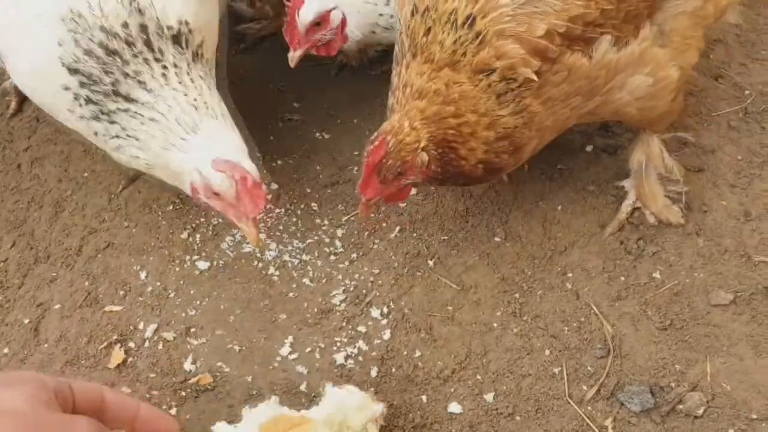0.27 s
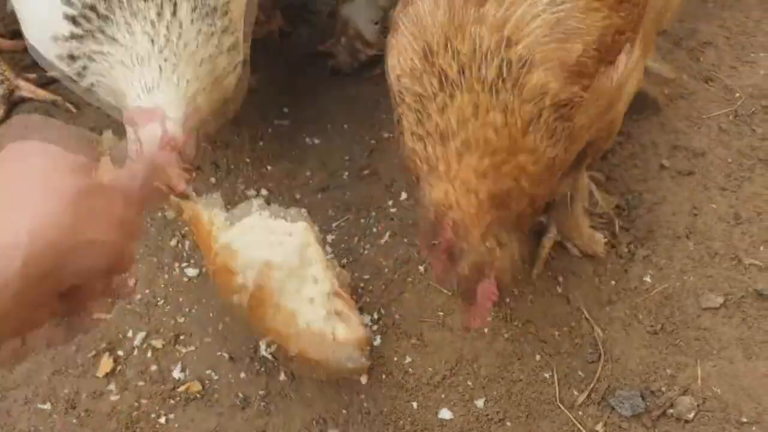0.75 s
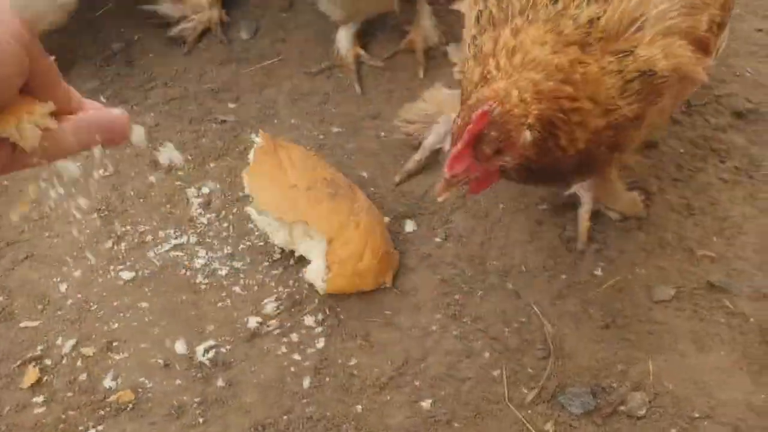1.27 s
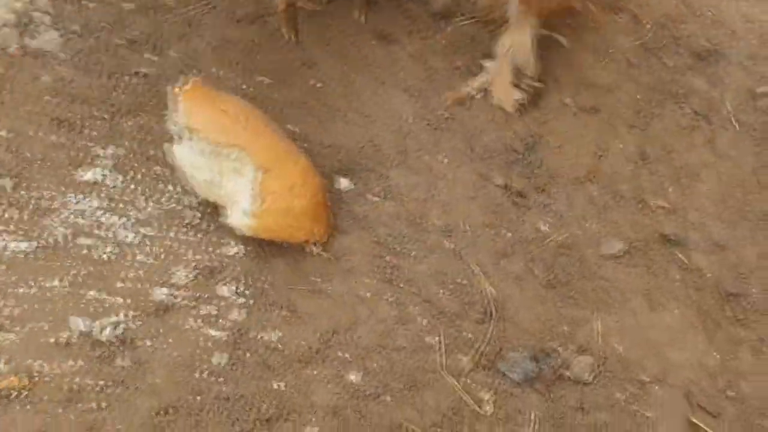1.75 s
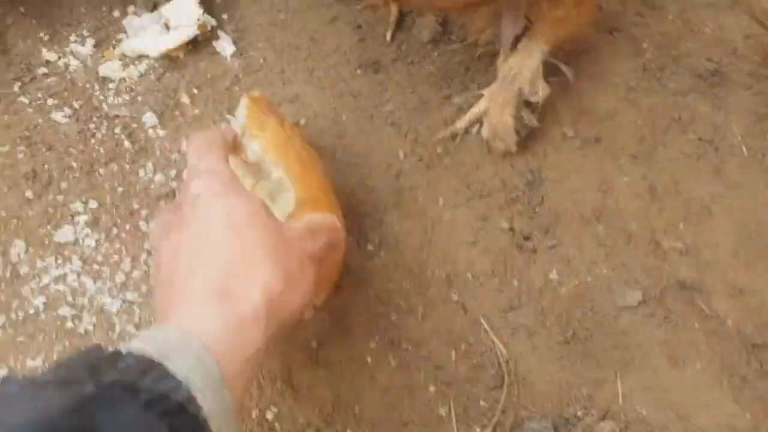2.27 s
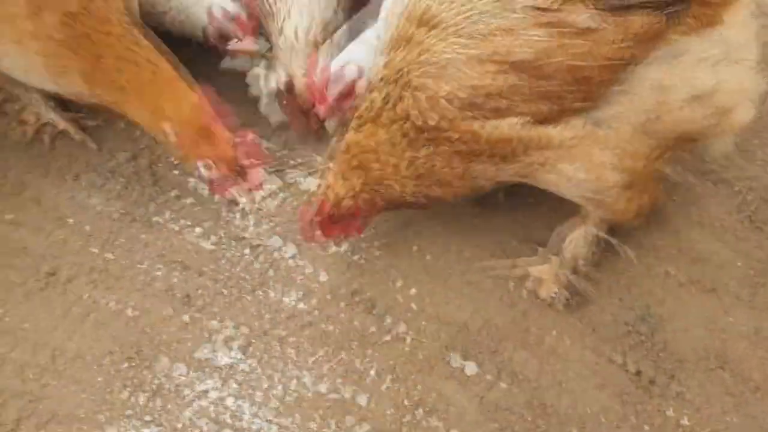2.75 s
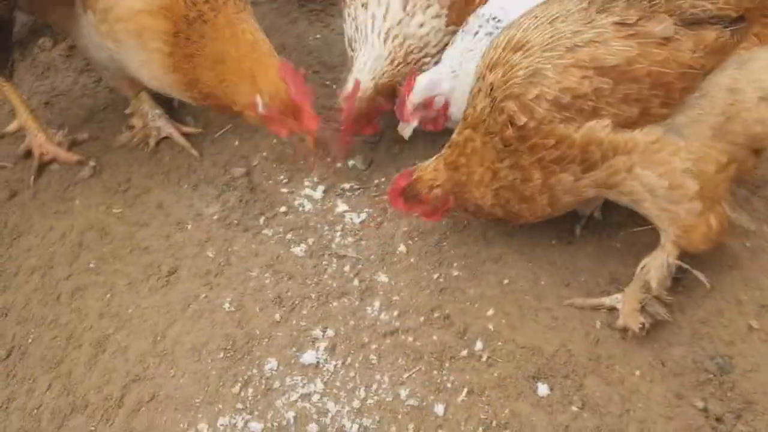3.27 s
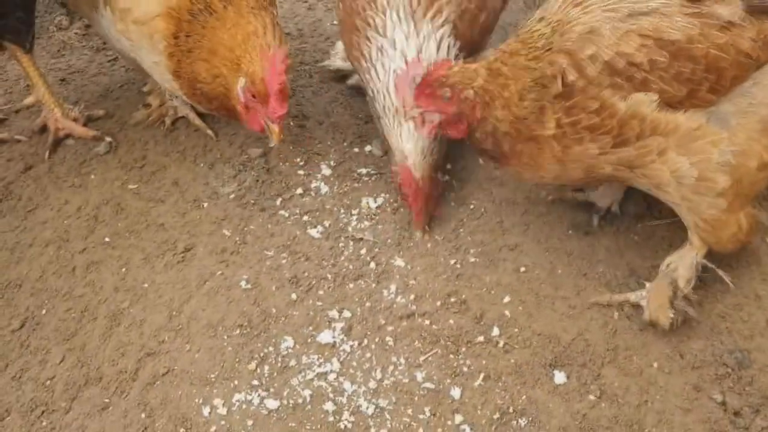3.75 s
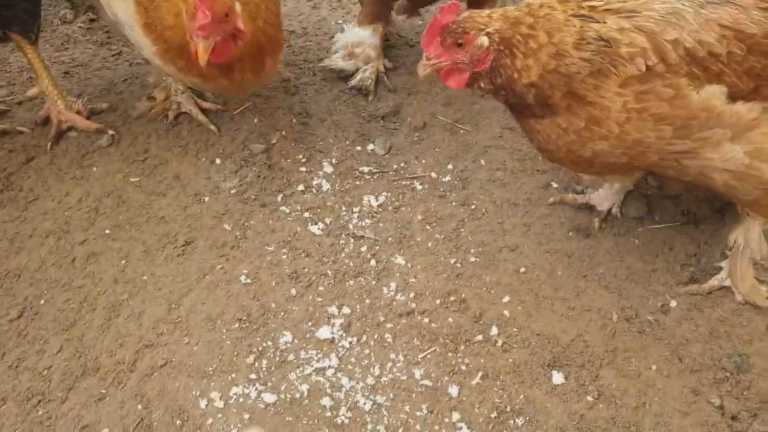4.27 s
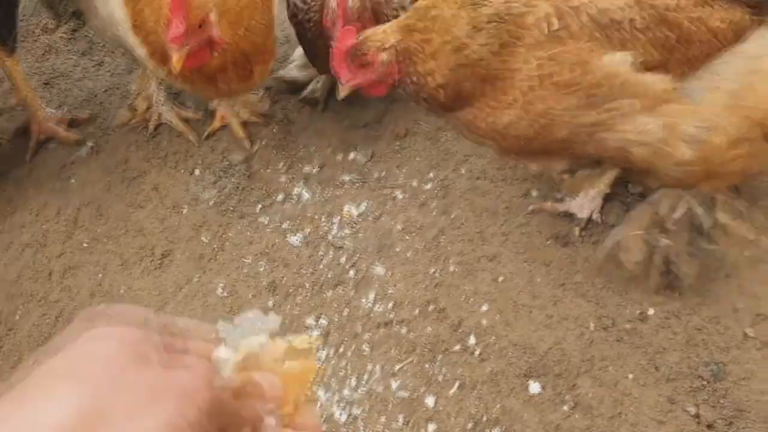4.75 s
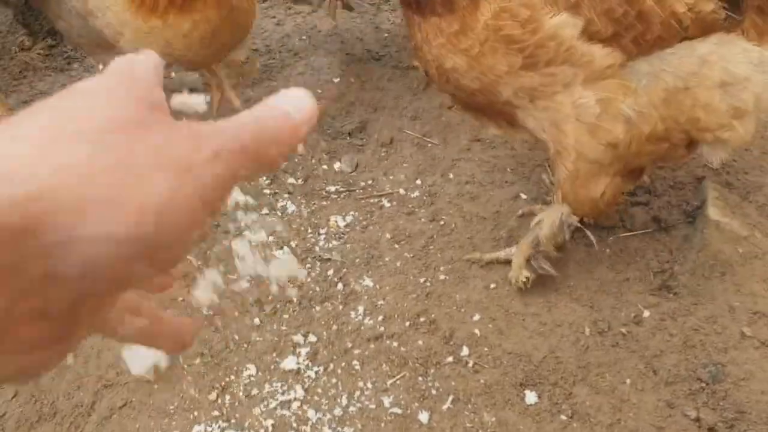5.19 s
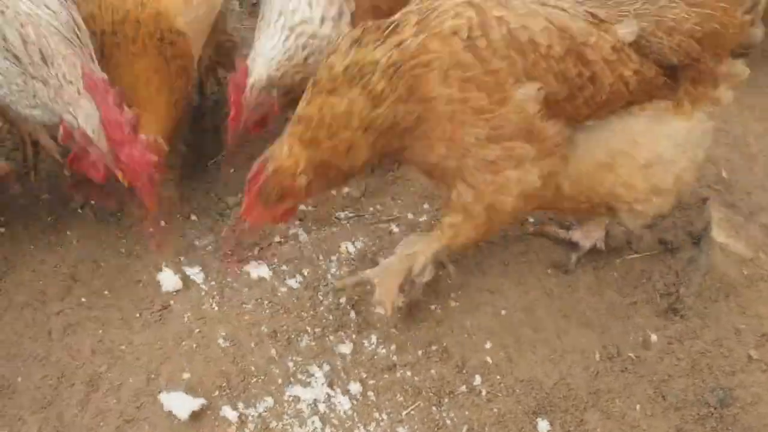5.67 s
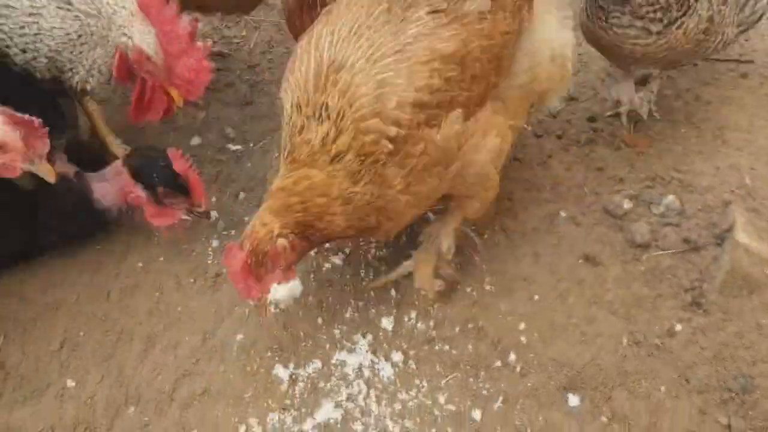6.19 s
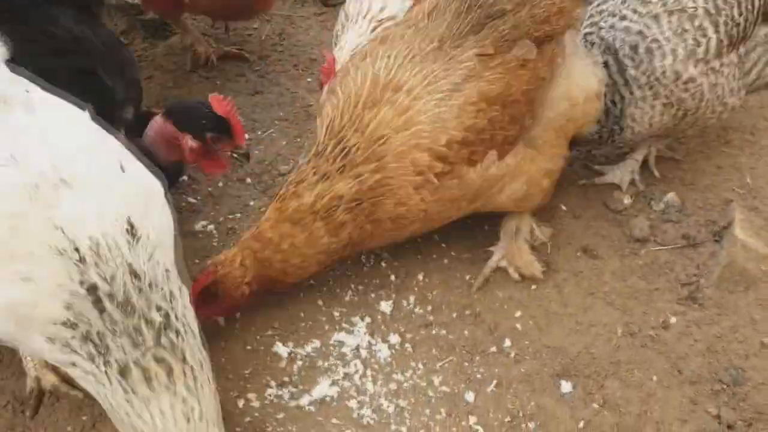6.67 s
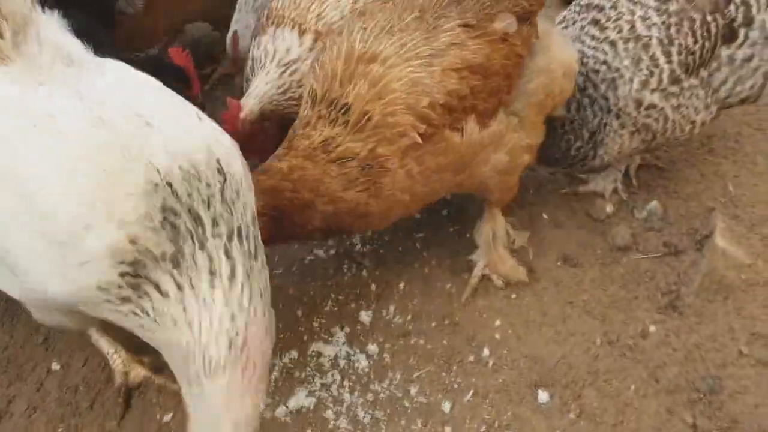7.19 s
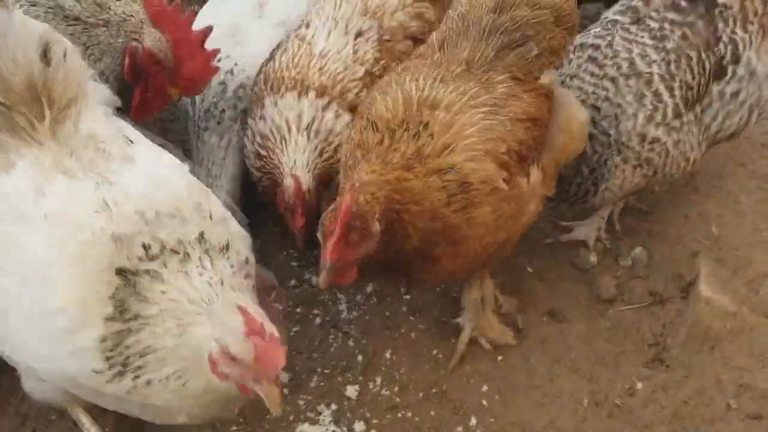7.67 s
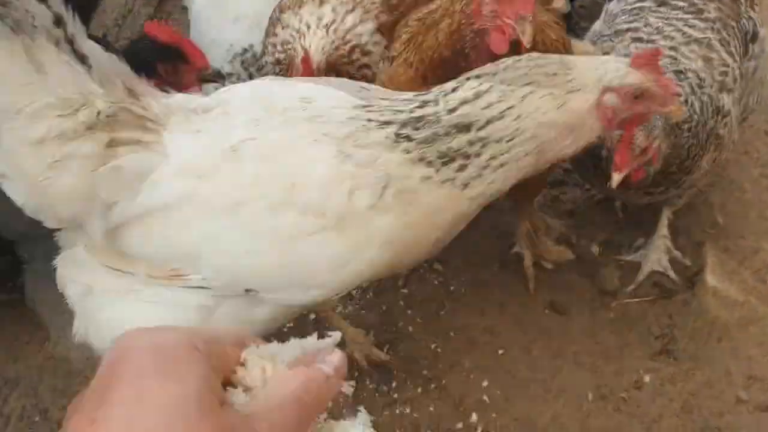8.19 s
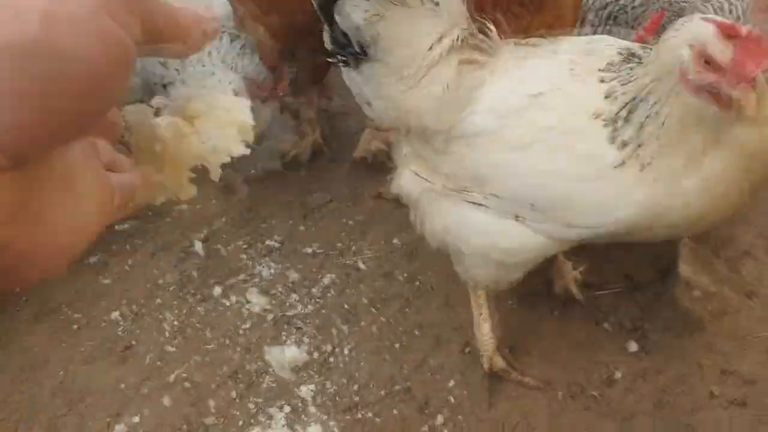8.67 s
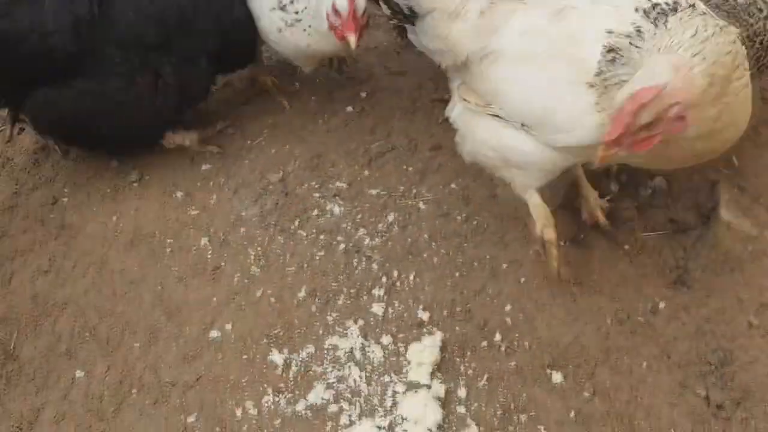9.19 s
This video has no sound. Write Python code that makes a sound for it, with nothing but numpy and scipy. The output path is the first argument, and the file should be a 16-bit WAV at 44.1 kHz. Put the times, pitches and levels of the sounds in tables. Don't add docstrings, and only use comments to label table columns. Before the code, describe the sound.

Close on a dirt yard, hens feed on bread. Quiet low murmurs and a rising hum come first, then a sharp peck and a burst of loud, throaty clucks between two and three seconds. Softer croaks follow, then fluttering trills, with ticking beaks, dull footfalls and rustling feathers. A small stereo microphone leans left over a faint low rumble.

```python
import sys
import numpy as np
from scipy import signal
from scipy.fft import rfft, irfft, next_fast_len
from scipy.io import wavfile
from scipy.ndimage import uniform_filter1d

SR = 44100
rng = np.random.default_rng(int(sys.argv[2]) if len(sys.argv) > 2 else 0)


def gain_from_decibels(decibels):
    exponent = np.asarray(decibels, float) / 20
    return 10 ** exponent


def transcribe(u):
    v = np.clip(np.atleast_2d(u).T, -1, 1)
    q = np.round(v * 32767).astype(np.int16)
    wavfile.write(sys.argv[1], SR, q)


N = 416304


def evened(x):
    return x / np.sqrt(np.mean(x ** 2) + 1e-20)


def read(points, hz):
    f, value = np.transpose(points)
    return np.interp(np.log(hz + 1), np.log(f + 1), value)


def wander(count, hz):
    return evened(signal.lfilter([1], [1, -np.exp(-2 * np.pi * hz / SR)], rng.standard_normal(count)))


def resonate(x, hz, width):
    turn = np.exp(2j * np.pi * np.cumsum(hz * np.ones(len(x))) / SR)
    r = np.exp(-np.pi * width / SR)
    return 2 * (turn * signal.lfilter([1 - r], [1, -r], x / turn + 1e-18)).real


def fade(count):
    u = np.arange(count) / SR
    return np.minimum(u / .003, 1) * np.minimum(u[::-1] / .014, 1)


def add(mix, s, sound, delay_ms, pan_db):
    lead = 32
    size = next_fast_len(len(sound) + 128)
    shift = np.array([[lead + delay_ms * SR / 1000], [lead]])
    z = rfft(sound, size) * np.exp(-2j * np.pi * np.fft.rfftfreq(size) * shift)
    ports = irfft(z, size) * gain_from_decibels([[pan_db / 2], [6.5 - pan_db / 2]])
    part = mix[:, round(s * SR) - lead:][:, :size]
    part += ports[:, :part.shape[1]]


def breath(row, lead_db, tail_db, first, last, hold, pitch_hold=None):
    s, rise, fall, db, hz = row
    t = np.arange(s - abs(rise), s + abs(fall), 1 / SR)
    early = t < s
    away = np.where(early, (s - t) / abs(rise), (t - s) / abs(fall))
    slack = away ** hold
    bend = away ** (pitch_hold or hold)
    effort_db = db - np.where(early, lead_db, tail_db) * slack
    pitch_hz = hz * (1 + (np.where(early, first, last) - 1) * bend)
    return t, effort_db, pitch_hz, slack


# centre in Hz, width in Hz, level in dB.
BEAK = [(2073, 190, 1), (2800, 250, -6), (3430, 700, -1), (4400, 1130, -9.5), (6080, 490, -14.5),
        (12500, 880, -15.5)]


def voice(effort_db, hz, mouth_hz, rough, uneven, bright_db):
    count = len(hz)
    under_peak_db = effort_db - effort_db.max()
    fray = .5 + (1.3 - .5) * np.clip(-under_peak_db / 12, 0, 1)
    width = 210 + 950 * rough
    rough, uneven = rough * fray, uneven * fray

    jitter = .3 * rough * wander(count, 150) + .025 * wander(count, 25)
    turns = np.cumsum(hz * (1 + jitter)) / SR
    folds = sum(np.cos(2 * np.pi * k * turns + .08 * k * k) * (k * hz < 9000) for k in range(1, 18))
    folds *= 1 + uneven * np.cos(np.pi * turns) + 1.31 * uneven * np.cos(2 / 3 * np.pi * turns)
    folds *= gain_from_decibels(9 * rough * wander(count, 70))
    puffs = (0.75 + np.exp(-(turns % 1) / 0.78)) * rng.standard_normal(count)
    drive = (1 - rough) * evened(folds) + .8 * rough * evened(puffs)

    def ring(f, w):
        return resonate(resonate(drive, f, w), f, w)

    mouth_hz = mouth_hz * gain_from_decibels(0.11 * under_peak_db + .5 * wander(count, 25))
    mouth, pipe = ring(mouth_hz, width), ring(350, 600)
    chest, open_pipe = ring(230, 200), ring(1500, 600)
    low = mouth - gain_from_decibels(-5.5) * pipe + gain_from_decibels(-3.0) * chest - gain_from_decibels(0.68 * bright_db - 2.0) * open_pipe

    airy = evened(drive) + 0.52 * evened(puffs)
    size = rng.uniform(.94, 1.06) * (1 + .05 * wander(count, 20))
    beak = sum((-1) ** k * gain_from_decibels(db) * resonate(airy, f * size, w) for k, (f, w, db) in enumerate(BEAK))
    beak -= resonate(beak, 0, 3200) / 2
    strain = gain_from_decibels(0.55 * under_peak_db + 2.0 * wander(count, 30))
    sound = evened(low) + gain_from_decibels(bright_db) * strain * evened(beak)
    limit = 2.6
    return gain_from_decibels(effort_db) * limit * np.tanh(sound / limit) * fade(count)


# peak in seconds, rise in seconds, fall in seconds,
# effort in dB, pitch in Hz.
CLUCKS = [
    [(2.28, 0.014, 0.04, -20.5, 700), (2.375, .006, 0.023, -22.5, 720), (2.392, .016, .062, -24.5, 680),
     (2.594, .017, 0.048, -20, 626.6), (5.566, 0.0098, 0.029, -22.5, 634)],
    [(2.358, .008, 0.025, -28, 753), (2.347, .012, 0.0097, -39.5, 750), (2.575, 0.018, 0.014, -32.5, 398),
     (2.642, .012, .018, -37, 479), (5.558, .018, 0.0095, -33, 684), (9.038, 0.04, 0.027, -23.5, 644.6)],
    [(3.708, .012, .022, -40, 730), (4.99, 0.0088, 0.067, -52.5, 667), (5.347, .007, 0.055, -48, 681)],
    [(1.402, 0.022, 0.047, -44.5, 804), (1.438, .012, 0.066, -31, 586.6), (8.589, .018, .02, -24.5, 640),
     (8.832, 0.023, 0.047, -29, 649.6)],
]
BACK_CLUCKS = [
    [(.178, 0.042, 0.058, -47.5, 375.5), (.765, 0.024, 0.04, -39.5, 284), (.9, 0.03, 0.044, -37, 292),
     (1.055, .035, 0.045, -43.5, 263.3)],
    [(.606, 0.021, 0.036, -48, 283), (1.901, 0.041, 0.052, -25, 288.6), (2.896, 0.031, 0.0035, -33, 308),
     (2.909, 0.0094, 0.048, -18.5, 361.7)],
    [(2.269, .008, .02, -26, 460), (2.082, 0.024, 0.034, -31.5, 430), (4.196, .016, 0.057, -31, 273),
     (3.35, 0.05, 0.1, -54.5, 150)],
    [(2.785, 0.021, 0.065, -26, 236)],
    [(3.44, 0.026, 0.18, -38, 231)],
    [(3.978, 0.031, 0.082, -29.5, 593)],
]
# mouth resonance in Hz, roughness 0-1,
# strong-weak pulse share 0-1, brightness in dB.
THROATS = [(1256, .28, 0.59, -3), (1253, .4, 0.3, -15), (700, .2, 1, -9.5), (990, .38, 0.3, -36),
           (740, 0.32, 0.2, -62), (931, .48, 0.33, -8), (540, 0.44, .4, -27), (760, 0.13, 0.47, -26.5),
           (680, 0.3, .5, -52), (640, 0.3, 0.4, -12.5)]
# dB under the peak at the start, dB under it at the end,
# pitch ratio at the start, pitch ratio at the end, hold as an exponent.
BREATHS = [(19.6, 22, 1.08, 1.05, 1.22), (19.7, 24, .95, .95, 1.03), (3, 15, 1.02, 1.05, 1.15),
           (22, 31, 1.1, 1.2, 1.14), (5.94, 19, 1.5, 0.9, 2.35), (22.1, 34, 1.15, 0.92, 0.98),
           (12.1, 31.5, 1.06, 0.91, 1.16), (7, 30.5, 0.82, 0.87, 0.86), (11.95, 9.5, 1.106, 1.12, 0.78),
           (16, 19.5, 1.14, 1.1, .7)]
# left delay in ms, left-right difference in dB.
PLACES = [(-0.16, 10.5), (-0.16, 8.5), (-.16, 7.5), (.2, 6.5), (0.24, 3.5), (-0.12, 8), (0.17, 7),
          (-0.27, 4), (-0.24, 4), (0.26, 8)]


def clucks():
    out = np.zeros((2, N))
    for rows, throat, shape, place in zip(CLUCKS + BACK_CLUCKS, THROATS, BREATHS, PLACES):
        for row in rows:
            t, effort_db, hz, _ = breath(row, *shape)
            effort_db = uniform_filter1d(effort_db, size=240)
            add(out, t[0], voice(effort_db, hz, *throat), *place)
    return out


def trill(shape, dip, rate_hz, depth, unsteady, overtone_db, bright_db, rasp, rasp_start, rasp_end):
    t, effort_db, hz, slack = shape
    count = len(t)
    uneven = np.clip(np.where(t < dip, rasp_start, rasp_end) * slack, 0, .9)
    beat = 2 * np.pi * rate_hz * (t - dip) + unsteady * wander(count, 12)
    swing = hz * (1 - depth * (np.cos(beat) - .2 * np.sin(2 * beat)))
    turn = 2 * np.pi * np.cumsum(swing * (1 + .02 * wander(count, 200))) / SR
    overtones = np.sin(2 * turn + 1) + 0.45 * np.sin(3 * turn)
    note = np.sin(turn) + uneven * np.sin(turn / 2) + gain_from_decibels(overtone_db) * overtones
    flutter_db = 27 * depth * np.cos(beat - 1 + 2.5 * slack * (t > dip))
    note *= np.sqrt(2) * gain_from_decibels(effort_db + flutter_db + 2.2 * wander(count, 40))
    hoarse = voice(effort_db, swing / 2, hz, 0.48, 1.0, bright_db + 25.0 - 12 * slack)
    return t[0], ((1 - uneven / 2) * note + (rasp + 1.33 * uneven) * hoarse) * fade(count)


# pitch dip at the peak in seconds, rise in seconds,
# fall in seconds, effort in dB, pitch in Hz.
TRILLS = [
    [(3.695, .012, 0.04, -36, 1230), (7.851, .016, .028, -28, 1110), (6.132, 0.008, 0.036, -36, 1010)],
    [(5.704, .094, .11, -32, 1348)],
    [(5.58, .012, .035, -29, 1220), (8.618, 0.022, 0.09, -25, 1290)],
    [(5.853, 0.024, 0.034, -40, 953), (6.272, 0.069, 0.073, -35.5, 1120), (6.627, .092, .082, -32.5, 1140),
     (8.252, .032, .048, -37.5, 1036)],
    [(5.108, 0.054, 0.14, -39, 571.5)],
    [(7.833, .021, 0.0103, -39.5, 720), (7.916, 0.057, .075, -34.5, 568)],
    [(3.785, .06, .1, -41, 1050)],
]
# rate in Hz, depth 0-1, unsteady beat in rad, overtones in dB.
FLUTTER = [(57.6, .13, .4, -22.5), (55.94, .18, .7, -23), (54.6, .08, .2, -21), (55.88, .24, 0.401, -22),
           (52.82, .12, 1.3, -7), (56.77, .11, 1.3, -7), (56, .1, 1, -18)]
# brightness in dB, share 0-1 at the peak, more at the start, more at the end.
HOARSE = [(-25, 0.4, .2, 0.7), (-38, 0.17, 0.38, 0.93), (-39, 0, 0.66, 0.68), (-30, 0.12, 0.96, 0.88),
          (-35, 0.22, 0.85, 0.36), (-19, 0.2, .15, 0.18), (-42, .6, .6, .6)]
# dB under the peak at the start, dB under it at the end,
# pitch ratio at the start, pitch ratio at the end, hold of level and hold of pitch as exponents.
TRILL_BREATHS = [(6.5, 12, .92, .86, 1.12, 1.2), (5.5, 16.5, 0.98, .64, 1.57, 1.4),
                 (7.5, 26, .9, .8, 3.1, 1.1), (9.5, 14.9, 0.66, 0.56, 2.17, 2.1),
                 (4, 10.4, 1.18, 0.76, 2.4, 1.6), (3, 20, .78, 0.6, 4, 2.4), (6, 12, 1.06, .85, 1.6, 1.5)]
# left delay in ms, left-right difference in dB.
TRILL_PLACES = [(-.15, 5), (-0.29, 8), (-.16, 6.4), (-0.143, 5.6), (-.55, 9.4), (-.15, 5), (-.3, 7)]


def trills():
    out = np.zeros((2, N))
    for rows, flutter, rasp, shape, place in zip(TRILLS, FLUTTER, HOARSE, TRILL_BREATHS, TRILL_PLACES):
        for row in rows:
            add(out, *trill(breath(row, *shape), row[0], *flutter, *rasp), *place)
    return out


# time in seconds, pitch in Hz, level in dB,
# level of the octave in dB.
HUMS = [
    [(.69, 570, -58, -66), (.87, 524, -63, -70), (.93, 530, -59, -52), (.97, 531, -58, -56)],
    [(1.09, 552, -57, -70), (1.22, 550, -58.5, -61), (1.3, 555, -54, -69), (1.396, 542, -52.5, -71),
     (1.466, 652, -46.5, -76), (1.64, 611, -56.5, -93)],
    [(3.57, 505, -58, -60), (3.63, 540, -52.5, -61), (3.69, 573, -57, -58)],
]


def hums():
    out = np.zeros((2, N))
    for rows in HUMS:
        s, *columns = np.transpose(rows)
        t = np.arange(s[0], s[-1], 1 / SR)
        hz, db, octave_db = (np.interp(t, s, column) for column in columns)
        turns = 2 * np.pi * np.cumsum(hz * (1 + 0.0223 * wander(len(t), 72))) / SR
        hum = gain_from_decibels(db) * np.sin(turns) + gain_from_decibels(octave_db) * np.sin(2 * turns)
        hum *= gain_from_decibels(4.5 * wander(len(t), 25)) * signal.windows.tukey(len(t), .1)
        add(out, t[0], 1.75 * hum, .3, 4.0)
    return out


# start in seconds, peak in dB, low part in dB.
PECKS = [(0.371, -47, -27), (0.374, -46.5, -25), (0.38, -41.5, -28), (1.8761, -41, 0), (5.054, -46.5, -3),
         (5.0764, -42.5, -5), (5.1, -47, -1), (6.5574, -45, 0), (7.8296, -41, 6), (7.852, -38, 5),
         (7.866, -38, 4), (8.165, -44, -20), (3.7389, -49.5, -8), (0.6, -38.5, 0), (0.6892, -43.5, 11),
         (0.927, -47, -18), (1.034, -40, -13), (1.6372, -21, -24), (2.6955, -56, 23), (3.0498, -55, -23.5),
         (3.099, -51, -22), (3.607, -43.5, -2), (3.8653, -55.5, 18), (5.5382, -41, 8), (6.302, -36, -3),
         (6.4721, -29.5, -33), (6.5174, -58, 20), (6.8738, -41.5, -15), (7.8192, -39, 0),
         (8.1537, -33, -21), (8.965, -40, -3)]


def pecks():
    out, t = np.zeros((2, N)), np.arange(1500) / SR
    for s, db, low_db in PECKS:
        snap = rng.standard_normal(len(t)) * gain_from_decibels(-60 * t / 0.014) * np.minimum(t / .0007, 1)
        knock = resonate(snap, 2650, 2700)
        add(out, s, gain_from_decibels(db + 3.5) * (snap - knock + gain_from_decibels(low_db - 3.0) * knock), -.1, 3.5)
    return out


# start in seconds, peak in dB.
THUDS = [(0.136, -44), (1.855, -44.5), (3.332, -47.5), (3.393, -41), (3.778, -39.5), (3.945, -43),
         (5.014, -50), (5.035, -43), (5.223, -40), (5.773, -39), (6.203, -37), (6.535, -39.5), (7.782, -50),
         (7.811, -39), (8.223, -42.5), (8.532, -52.5), (8.569, -39.5)]


def thuds():
    out, t = np.zeros((2, N)), np.arange(2500) / SR
    for s, db in THUDS:
        puff = rng.standard_normal(len(t)) * t * gain_from_decibels(-60 * t / 0.077)
        push = resonate(resonate(puff, 250, 260), 250, 260)
        push += gain_from_decibels(-17.0) * resonate(puff, 700, 900)
        add(out, s, gain_from_decibels(db - .5) * push / abs(push).max(), -.1, 3.0)
    return out


# first pitch in Hz, last pitch in Hz, level in dB, 60 dB decay in seconds.
THUMP = (114, 84, -39, 1)


def thump():
    first_hz, last_hz, db, t60 = THUMP
    t, out = np.arange(SR // 2) / SR, np.zeros((2, N))
    hz = last_hz + (first_hz - last_hz) * np.exp(-t / 0.068)
    ring = gain_from_decibels(db - 60 * t / t60) * np.sin(2 * np.pi * np.cumsum(hz) / SR)
    add(out, 5.893, ring, -.1, 2.5)
    return out


def ground(x):
    at = np.arange(40, 6000, 30) + rng.integers(0, 30, (2, 199))
    taps = np.zeros((2, 6100))
    np.put_along_axis(taps, at, rng.choice([-1., 1.], at.shape), 1)
    t = np.arange(6100) / SR
    taps *= gain_from_decibels(-60 * t / 0.024) + gain_from_decibels(-11.5 - 60 * t / 0.21)
    taps /= np.linalg.norm(taps, axis=1, keepdims=True)
    return signal.fftconvolve(x, taps, axes=1)[:, :N]


# frequency in Hz, coherence 0-1.
SAME = [(40, .8), (100, .92), (300, .7), (640, .33), (1400, 0)]


def field(colour, patchy_db, flicker_db):
    frames, hz = N // 256 + 5, np.fft.rfftfreq(1024, 1 / SR)
    a, b, c, d, patches = rng.standard_normal((frames, 513, 5)).T
    patches = evened(uniform_filter1d(uniform_filter1d(patches, 14, 0), 10, 1))
    flicker = evened(uniform_filter1d(rng.exponential(1, frames) - 1, size=2))
    same = np.clip(read(SAME, hz), -1, 1)[:, None]
    left, other = a + 1j * b, c + 1j * d
    z = np.array([left, same * left + np.sqrt(1 - same ** 2) * other])
    z *= gain_from_decibels(read(colour, hz)[:, None] + patchy_db * patches + flicker_db * flicker)
    return evened(signal.istft(z, nperseg=1024, noverlap=768)[1][:, :N])


# time in seconds, level in dB.
RUSTLE = [(0, -52), (.25, -64), (.73, -66), (1.65, -61), (1.92, -63.5), (2.34, -54.5), (2.9, -60),
          (3.26, -68.5), (4.15, -69.5), (5.0, -69), (5.75, -55.5), (6.18, -66.5), (6.4, -57.5), (7.13, -71),
          (7.65, -75), (8.3, -63.5), (9.3, -60), (9.44, -66)]
# frequency in Hz, density in dB per Hz.
RUSTLE_COLOUR = [(290, -46.5), (500, -13), (570, -13.5), (1090, -5.5), (2390, -9), (4280, -4.5), (7310, -3),
                 (8700, -12.5), (11600, -4), (16000, -9.5)]
# centre in seconds, length in seconds, level in dB.
SCUFFS = [(0.384, 0.024, -55.5), (0.626, 0.073, -45.5), (0.756, .13, -50), (1.054, 0.042, -65),
          (1.452, 0.057, -49), (2.776, 0.22, -47.5), (3.994, 0.15, -52.5), (4.676, 0.067, -51),
          (6.307, 0.069, -50.5), (6.486, 0.06, -49), (7.584, 0.19, -54), (7.887, 0.11, -51),
          (7.791, .03, -60.5), (5.092, .07, -50)]


def rustle():
    t = np.arange(N) / SR
    power = gain_from_decibels(np.interp(t, *np.transpose(RUSTLE)) + 4.5) ** 2
    power += sum(gain_from_decibels(db) ** 2 * np.exp(-(2 * (t - s) / length) ** 2) for s, length, db in SCUFFS)
    return np.sqrt(power) * field(RUSTLE_COLOUR, 2.1, 1.1)


# start in seconds, length in seconds, level in dB,
# first pitch in Hz, last pitch in Hz.
CHIRPS = [
    (1.71, 0.092, -60.5, 4200, 3610),
    (3.177, 0.078, -57.5, 4050, 3920),
    (5.899, 0.084, -55.5, 4200, 4100),
]


def sparrow():
    out = np.zeros((2, N))
    for s, length, db, first_hz, last_hz in CHIRPS:
        hz = np.linspace(first_hz, last_hz, round(length * SR))
        whistle = evened(resonate(rng.standard_normal(len(hz)), hz, 120))
        add(out, s, gain_from_decibels(db) * np.hanning(len(hz)) * whistle, .1, 3.0)
    return out


# frequency in Hz, density in dB per Hz.
YARD = [(76, -30.5), (130, -9.5), (238, -11.5), (418, -16), (565, -23.5), (613, -19.5), (2410, -48),
        (6600, -35.5), (8740, -35), (16000, -26.5)]
# time in seconds, level in dB.
YARD_SWELL = [(0.0, -72.5), (1.57, -69.5), (2.73, -61.5), (3.23, -75.5), (3.63, -61), (4.55, -81),
              (5.83, -59), (6.49, -68.5), (7.78, -76), (7.94, -69), (8.96, -65.5), (9.44, -73)]


def yard():
    swell_db = np.interp(np.arange(N) / SR, *np.transpose(YARD_SWELL))
    level_db = -66 + 5.0 + 0.599 * (swell_db - swell_db.mean())
    return gain_from_decibels(level_db) * field(YARD, 2.2, 0.33)


# centre in Hz, width in Hz, level in dB.
RUMBLE = [(50.65, 18, -5.5), (67, 15, -0.5), (95.4, 29, -2.5)]


def rumble():
    size = next_fast_len(N)
    shared, left, right = rng.standard_normal((3, size))
    f = np.fft.rfftfreq(size, 1 / SR)
    colour = sum(gain_from_decibels(db) / (1 + (2 * (f - hz) / width) ** 2) for hz, width, db in RUMBLE)
    ports = irfft(rfft(shared + .4 * np.array([left, right])) * colour, size)[:, :N]
    return gain_from_decibels(-58 + 1.0) * evened(ports)


def scene():
    near = clucks() + trills() + hums() + pecks() + thuds()
    echoes = gain_from_decibels(-9) * ground(near)
    return near + echoes + thump() + rustle() + sparrow() + yard() + rumble()


def band_limit(x):
    return signal.sosfilt(signal.butter(12, 16970, fs=SR, output="sos"), x)


# frequency in Hz, gain in dB.
SHADE = [(60, -3), (300, -5.5), (1200, -3), (4200, -3), (6800, -3), (7800, -12), (8700, -45), (9800, -13.5),
         (16000, -18)]


def record(dry):
    size = next_fast_len(N)
    hz = np.fft.rfftfreq(size, 1 / SR)
    colour = np.array([np.ones(len(hz)), gain_from_decibels(read(SHADE, hz))])
    colour *= np.where(hz < 15870, 1, gain_from_decibels(-22))
    mix = irfft(rfft(dry, size) * colour, size)[:, :N]
    return band_limit(mix)


dry = scene()
out = record(dry)
transcribe(out)
```